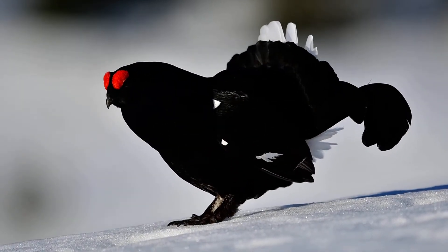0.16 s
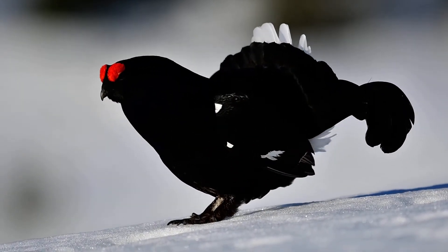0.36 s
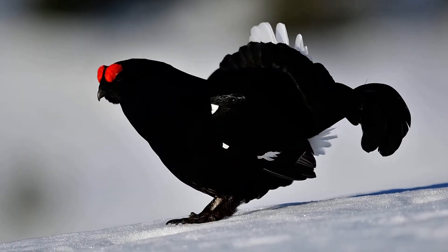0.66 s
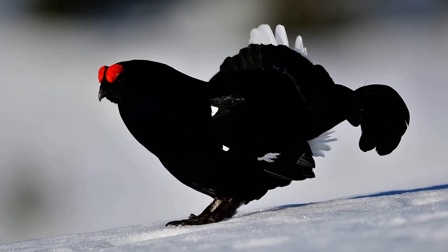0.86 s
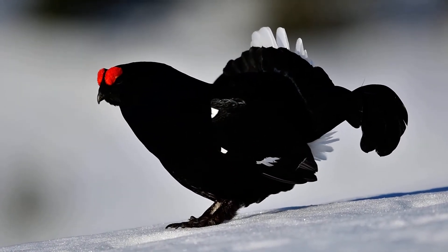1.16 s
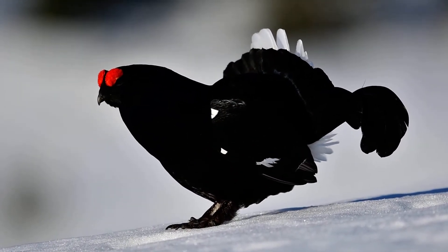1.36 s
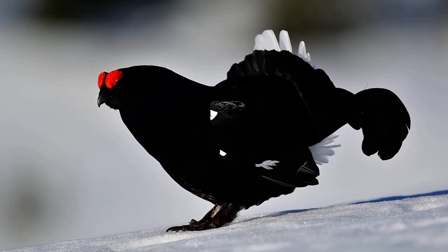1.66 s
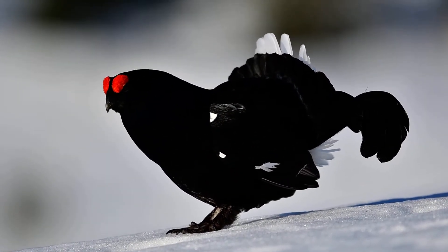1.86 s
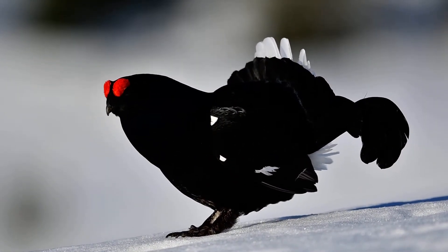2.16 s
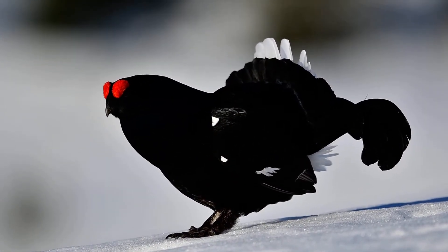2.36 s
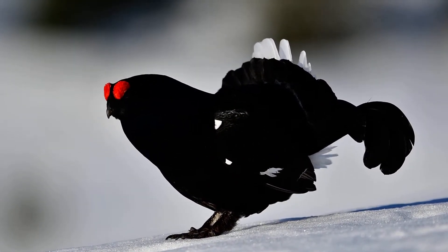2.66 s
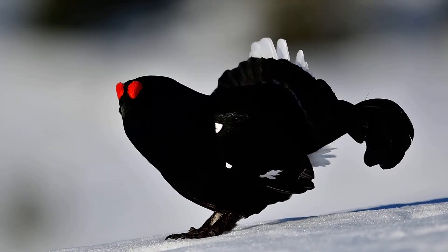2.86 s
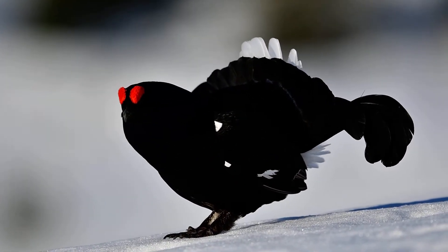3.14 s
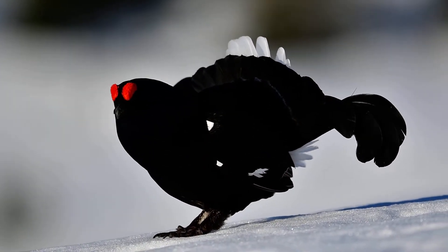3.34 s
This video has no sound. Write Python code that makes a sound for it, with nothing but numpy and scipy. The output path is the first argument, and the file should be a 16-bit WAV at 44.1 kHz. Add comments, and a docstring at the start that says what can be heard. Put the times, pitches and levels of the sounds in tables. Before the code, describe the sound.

On open snow, a black grouse in front of the microphone gives two runs of low coos with quiet bubbling between them. Faint feather scuffs, a few dry ticks, distant chirps and murmuring far-off grouse sit over a soft hiss.

```python
"""Black grouse on open snow

Straight ahead of the microphone a black grouse coos: its notes arch in pitch and bloom as they
pass the resonance of its air sac. Between the loud phrases it bubbles softly, and feathers scuff the
snow. Other cocks murmur far off, a small bird repeats a rising chirp away to the right, and a few dry
ticks sound over faint air, microphone hiss and a trace of electronic whine."""
import sys
import numpy as np
from scipy import signal
from scipy.fft import rfft, irfft
from scipy.io import wavfile

SR = 44100
rng = np.random.default_rng(int(sys.argv[2]) if len(sys.argv) > 2 else 0)


def materialize(psi):
    """Save the field psi as 16-bit PCM at rate SR to the path in sys.argv[1].

    A 1-D psi becomes a single channel; in a 2-D psi each row is a channel.
    """
    bounded = np.clip(np.atleast_2d(psi).T, -1, 1)
    quanta = np.round(bounded * 32767).astype(np.int16)
    wavfile.write(sys.argv[1], SR, quanta)


N = 154350

# slow swell shared by the air and the rush (time [s], level [dB])
SWELL_CURVE = [(0, 1), (1.4, 0.5), (2.8, 0.07), (3.27, 1.5), (3.5, 1.5)]


def amp(db):
    """Decibels to gain."""
    return 10 ** (np.asarray(db) / 20)


def unit(x):
    """Scales to rms 1."""
    return x / np.sqrt(np.mean(x ** 2) + 1e-20)


def pan(db):
    """Left and right gains for a level difference, left minus right."""
    return amp([[db / 2], [-db / 2]])


def read(points, hz):
    """Reads a spectrum on a log-frequency axis."""
    f, v = np.transpose(points)
    return np.interp(np.log(hz + 1), np.log(f + 1), v)


def add(mix, s, sound):
    """Mixes a sound in at time s."""
    part = mix[..., max(round(s * SR), 0):][..., :sound.shape[-1]]
    part += sound[..., :part.shape[-1]]


def ease(u):
    """Smooth step from 0 to 1."""
    return .5 - .5 * np.cos(np.pi * np.clip(u, 0, 1))


def bins():
    """Frequencies of the whole-length spectrum."""
    return np.fft.rfftfreq(N, 1 / SR)


def noise(gain, likeness):
    """Stereo noise with a given spectrum and left-right likeness (-1 to 1)."""
    a, b = rfft(rng.standard_normal((2, N)))
    mid, side = a * np.sqrt((1 + likeness) / 2), b * np.sqrt((1 - likeness) / 2)
    return irfft(np.array([mid + side, mid - side]) * gain, N)


def band(hz, width, db, likeness):
    """A narrow band of stereo noise at an rms level."""
    shape = 1 / (1 + ((bins() - hz) / (1.12 * width)) ** 2) ** 3.23
    return amp(db) * unit(noise(shape, likeness))


def swell(depth=1):
    """The slow swell as a gain; depth multiplies its decibels."""
    return amp(depth * np.interp(np.arange(N) / SR, *np.transpose(SWELL_CURVE)))


def open_air():
    """Faint air over the snow, centred in the bass and wide higher up."""
    # spectrum before the swell (frequency [Hz], density [dB per Hz])
    spectrum = [(20, -114), (60, -103), (100, -103), (135, -93.5), (175, -97), (220, -93.5), (320, -93),
                (700, -95.5), (1100, -98), (1600, -103), (2300, -108), (4000, -122)]
    # stereo image (frequency [Hz], left-right likeness)
    likeness = [(20, 1), (300, 1), (700, 0.71), (1200, 0), (4000, 0)]
    f = bins()
    return np.sqrt(SR / 2) * noise(amp(read(spectrum, f)), read(likeness, f)) * swell(depth=1.4)


def hollow_rush(pan_db=-7):
    """A faint hollow rush, mostly right of the microphone."""
    # midrange bands (centre [Hz], width [Hz], level [dB], left-right likeness)
    bands = [(1264, 180, -75.5, 0.066), (1396, 188, -73, 0.029), (1692, 97, -73.5, -0.78),
             (1990, 255, -75.5, -0.63)]
    return sum(band(*row) for row in bands) * pan(pan_db) * swell()


def far_cocks(throb_hz=20, throb_db=2):
    """Distant cocks blur into a murmur in which each pitch comes and goes by itself."""
    # pitches of the chorus (centre [Hz], width [Hz], level [dB], left-right likeness)
    chorus = [(365.5, 26.3, -69.5, 1), (448.4, 65, -68.3, .995), (510.5, 42, -66.3, 0.95),
              (597, 180, -72, 0.9)]
    slow = np.exp(-(bins() / throb_hz) ** 2)
    return sum(band(*row) * unit(amp(throb_db * unit(noise(slow, 0.8)))) for row in chorus)


def microphone_hiss():
    """Steady hiss, independent in each channel."""
    # noise floor (frequency [Hz], density [dB per Hz])
    spectrum = [(20, -135), (1000, -108), (3300, -104.5), (4900, -103.5), (7000, -106), (9000, -108),
                (12000, -111), (15500, -114.5)]
    return np.sqrt(SR / 2) * noise(amp(read(spectrum, bins())), 0)


def whine(fundamental_hz=1170.35):
    """Steady overtones of the electronics, barely above the hiss."""
    # partials of the whine (multiple of the fundamental, level [dB])
    overtones = [(2, -92), (3, -92), (4, -90), (5, -91.5), (9, -97), (10, -98), (11, -100), (12, -101)]
    phase = 2 * np.pi * fundamental_hz * np.arange(N) / SR
    return sum(amp(db) * unit(np.sin(k * phase + 2 * np.pi * rng.random())) for k, db in overtones)


def grouse_note(start, t, hz, flutter, attack_s=.0075, release_s=.011):
    """One fluttering note with soft ends and two strong overtones, near-pure once filtered."""
    pitch_flutter, level_flutter = np.roll(flutter, -round(start * SR), 1)[:, :len(t)]
    phase = 2 * np.pi * np.cumsum(hz * (1 + .009 * pitch_flutter)) / SR
    wave = np.sin(phase) + amp(-12) * np.sin(2 * phase) + amp(-6) * np.sin(3 * phase)
    edges = ease(t / attack_s) * ease((t[-1] - t) / release_s)
    return edges * amp(.6 * level_flutter) * wave


def air_sac(voice, resonance_hz=506, width_hz=82):
    """Notes bloom near the sac's resonance."""
    return signal.lfilter(*signal.iirpeak(resonance_hz, resonance_hz / width_hz, SR), voice)


def soften(voice, cutoff_hz=720, shelf_db=-10):
    """A low-pass shelf softens the notes above its cutoff."""
    passed = 1 / (1 + (bins() / cutoff_hz) ** 28)
    return irfft(rfft(voice) * (passed + (1 - passed) * amp(shelf_db)), N)


def grouse(flutter_hz=85, bubble_fall=.26):
    """The nearest cock: arched coos and soft falling bubbles ring through its air sac."""
    # coos ahead of the sac; a long one is three notes run together (start [s], length [s], rise [s],
    # first pitch [Hz], top pitch [Hz], last pitch [Hz], level [dB], swell from start to end [dB])
    coos = [(0, 0.069, 0.035, 390.4, 655, 425, -38.5, 9), (0.097, 0.059, 0.024, 488, 610, 372, -41, 4.5),
            (0.184, 0.045, 0.026, 360.0, 647, 460.0, -37.5, 3),
            (0.222, 0.058, 0.018, 663, 598, 625.0, -38.5, -7),
            (0.273, 0.068, 0.029, 573.0, 621, 405, -41, 10),
            (0.434, 0.022, 0.014, 513, 556, 421.0, -37.8, 3.4),
            (0.455, 0.046, 0.019, 480, 596.0, 500, -35.5, 1),
            (0.519, 0.021, 0.016, 357, 573, 524.0, -38.5, -1),
            (0.555, 0.019, 0.002, 623, 614, 370.0, -37.1, 8.5),
            (0.62, 0.029, 0.018, 594, 626, 511.0, -27.5, 1),
            (0.706, 0.059, 0.024, 489.0, 646.6, 453, -32, 2),
            (0.783, 0.055, 0.03, 444, 630.0, 426.0, -38.5, -3),
            (0.874, 0.042, 0.0017, 645, 615, 430, -37.5, 7.5),
            (1.095, 0.033, 0.013, 610, 650, 332, -34.8, -5),
            (1.63, 0.041, 0.0018, 543.0, 527, 356, -43.5, -4.5),
            (2.426, 0.047, 0.01, 489.0, 572, 368, -40.5, 2), (2.497, 0.057, 0.0097, 567, 629, 383, -38, -3),
            (2.568, 0.044, 0.016, 488, 676, 403, -39, 10.5),
            (2.65, 0.021, 0.0036, 631.0, 649, 373, -37.5, 10.4),
            (2.905, 0.081, 0.039, 510, 649.5, 456, -40.5, 11.5),
            (3.045, 0.034, 0.011, 554, 667, 502, -35.5, 14),
            (3.154, 0.074, 0.04, 372, 634, 382.0, -38.5, 6),
            (3.253, 0.061, 0.025, 409, 602, 407, -42.5, 13), (3.345, 0.045, 0.027, 367, 645, 457, -37, 2.3),
            (3.382, 0.069, 0.029, 618, 586, 657.0, -41, -11),
            (3.44, 0.058, 0.018, 458.0, 622, 405, -40.5, 13.5)]
    # bubbles ahead of the sac (start [s], length [s], middle pitch [Hz], level [dB])
    bubbles = [(1.16, 0.017, 485, -45.5), (1.392, 0.021, 462, -48), (1.699, 0.034, 441, -45),
               (1.847, 0.053, 423, -48), (1.918, 0.042, 446, -46), (1.984, 0.055, 475, -48),
               (2.059, 0.027, 487, -45), (2.138, 0.019, 450, -41.5), (2.209, 0.022, 442, -47.5),
               (2.28, 0.028, 443, -49.5), (2.356, 0.036, 471, -46)]
    voice = np.zeros(N)
    flutter = unit(noise(np.exp(-((bins() - flutter_hz) / (.5 * flutter_hz)) ** 2), 0))
    for start, length, rise, first, top, last, db, swell_db in coos:
        t = np.arange(0, length, 1 / SR)
        approach = np.maximum(1 - t / rise, 0) ** 2
        fall = np.clip((t - rise) / (length - rise), 0, 1) ** 1.683  # ever faster after the top
        hz = top + (first - top) * approach + (last - top) * fall
        gain = amp(db + swell_db * (t / length - .5))
        add(voice, start, gain * grouse_note(start, t, hz, flutter))
    for start, length, middle_hz, db in bubbles:
        t = np.arange(0, length, 1 / SR)
        hz = middle_hz * (1 - bubble_fall * (t / length - .5))
        add(voice, start, amp(db) * grouse_note(start, t, hz, flutter))
    return air_sac(voice)


def echo(call, t60_s=.29, reflections_per_s=1500):
    """Thin scatter from the slopes and trees, nearly alike in both channels."""
    t = np.arange(SR) / SR
    reflections = rng.standard_normal((2, SR)) * (rng.random((2, SR)) < reflections_per_s / SR)
    mid, side = reflections * ease(t / 0.012) * amp(-60 * t / t60_s)
    tail = np.array([mid + 0.063 * side, mid - 0.09 * side]) / np.linalg.norm(mid)
    return signal.fftconvolve(call[None], tail, axes=1)[:, :N]


def feather_scuffs(width_octaves=.54):
    """Feathers brush the snow in short swells of midrange rustle."""
    # soft scuffs (peak time [s], half-length [s], centre [Hz], level [dB])
    scuffs = [(0.027, 0.033, 1900, -62.5), (0.192, 0.066, 2110, -65.5), (2.978, 0.018, 1050, -64),
              (3.266, 0.11, 1020, -62.5)]
    out, t = np.zeros((2, N)), np.arange(N) / SR
    for s, half_length, hz, db in scuffs:
        spectrum = np.exp(-(np.log2((bins() + 1) / hz) / width_octaves) ** 2)
        out += amp(db) * ease(1 - abs(t - s) / half_length) * unit(noise(spectrum, 0.6))
    return out


def dry_ticks(size=512, crunch_db=-11.5, skirt_db=-17, skirt_top_ratio=2.37):
    """Each tick is one sharp snap and a millisecond of crunch, in a band with a weak treble skirt."""
    # ticks (time [s], centre [Hz], width [octaves], decay [s], snap [dB], left minus right [dB])
    ticks = [(0.025, 3280, 0.42, 0.0012, -46.5, -8), (0.2938, 5380, 0.29, 0.00094, -33.5, 12),
             (2.4464, 7000, .25, .0008, -50, 0), (2.4766, 6700, .3, 0.00091, -51, 0),
             (2.4913, 4700, 0.55, 0.0011, -48.5, 0)]
    out, t = np.zeros((2, N)), np.arange(size) / SR
    f = np.fft.rfftfreq(size, 1 / SR) + 1
    for s, hz, octaves, decay, db, pan_db in ticks:
        body = np.exp(-(np.log2(f / hz) / octaves) ** 2)
        skirt = amp(skirt_db) * ease(f / hz - .5) / (1 + (f / (skirt_top_ratio * hz)) ** 20)
        snap = np.roll(irfft(body + skirt), size // 2)
        drive = (t == 0) + amp(crunch_db) * rng.standard_normal(size) * np.exp(-t / decay)
        add(out, s - size / 2 / SR, pan(pan_db) * amp(db) * np.convolve(drive, snap / snap.max()))
    return out


def small_bird():
    """A distant bird's thin sweeps rise, flick upward and fall away."""
    # chirps (centre time [s], pitch [Hz], level [dB])
    chirps = [(.122, 5000, -73), (.342, 4900, -70), (0.558, 5010, -67.5), (.770, 4800, -68),
              (.975, 4800, -72), (1.179, 4800, -72), (1.378, 4640, -72.5)]
    # sweep of every chirp (time from its centre [s], offset from its pitch [Hz])
    contour = [(-.021, -600), (-.010, -250), (.005, 130), (.015, 850), (.026, 150)]
    at, offset = np.transpose(contour)
    out, t = np.zeros(N), np.arange(at[0], at[-1], 1 / SR)
    for s, hz, db in chirps:
        phase = 2 * np.pi * np.cumsum(hz + np.interp(t, at, offset)) / SR
        add(out, s + at[0], amp(db) * np.hanning(len(t)) ** .5 * np.sin(phase))
    return out


def scene():
    """The grouse straight ahead of the microphone, the small bird far right, open snow all around."""
    bed = open_air() + hollow_rush() + far_cocks() + microphone_hiss()
    cock, bird = soften(grouse()), small_bird()
    far_bird = pan(-11) * (bird + amp(-14) * echo(bird))
    near_cock = cock + amp(-20) * echo(cock)
    return bed + near_cock + far_bird + dry_ticks() + feather_scuffs() + whine()


def record(dry, cutoff_hz=15800):
    """The recorder: two notch filters, then the band limit."""
    # notch filters (centre [Hz], width between the points about 2 dB down [Hz])
    notches = [(2610, 740), (7700, 1520)]
    f = bins()
    gain = np.prod([(f - hz) ** 2 / ((f - hz) ** 2 + (width / 4) ** 2) for hz, width in notches], axis=0)
    notched = irfft(rfft(dry) * gain, N)
    lowpass = signal.firwin(511, cutoff_hz, window=("kaiser", 9), fs=SR)
    return signal.oaconvolve(notched, lowpass[None], "same")


dry = scene()
out = record(dry)
materialize(out)
```